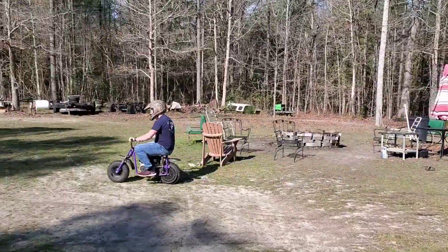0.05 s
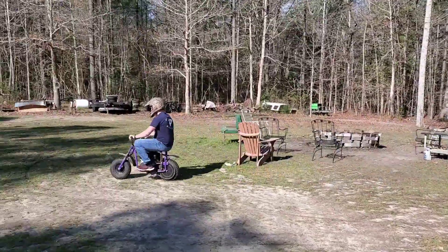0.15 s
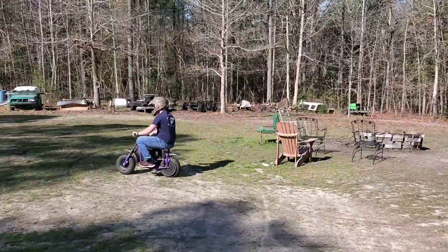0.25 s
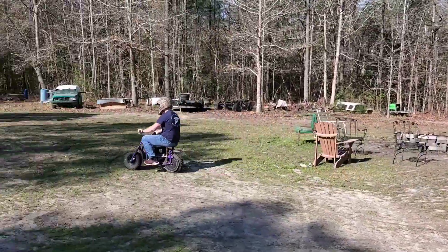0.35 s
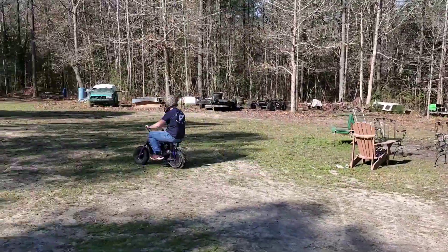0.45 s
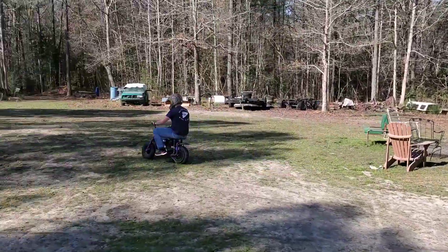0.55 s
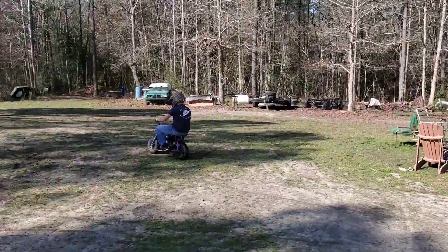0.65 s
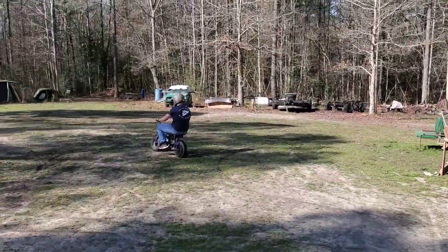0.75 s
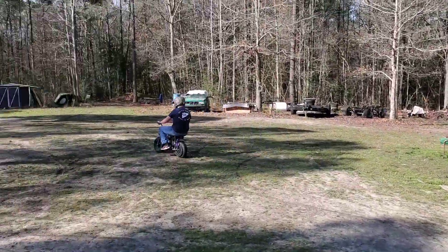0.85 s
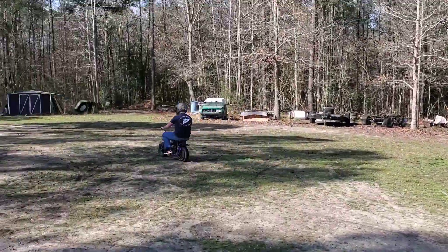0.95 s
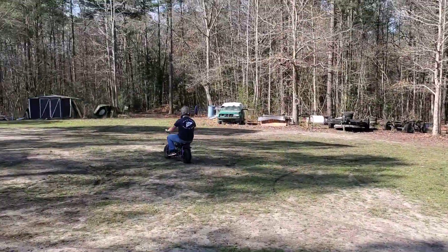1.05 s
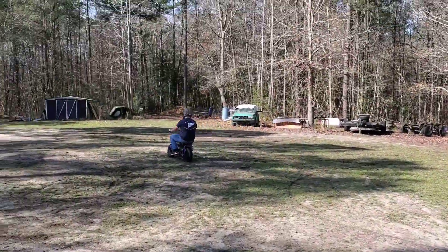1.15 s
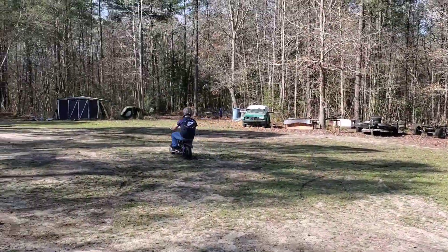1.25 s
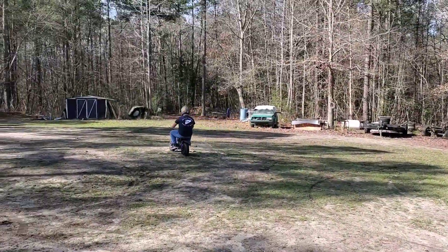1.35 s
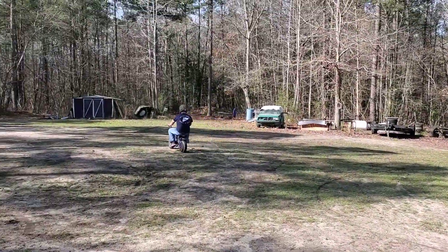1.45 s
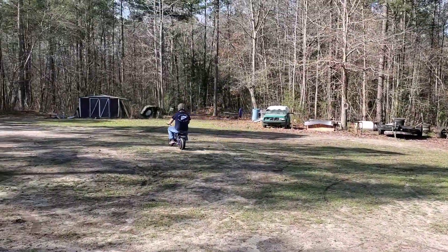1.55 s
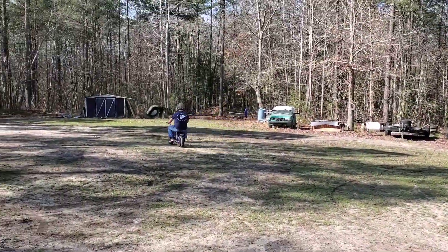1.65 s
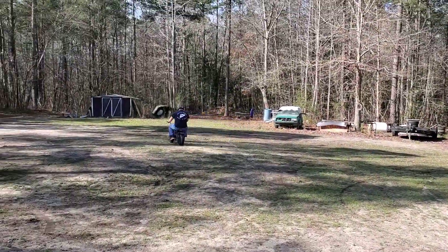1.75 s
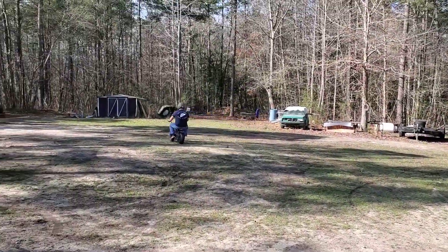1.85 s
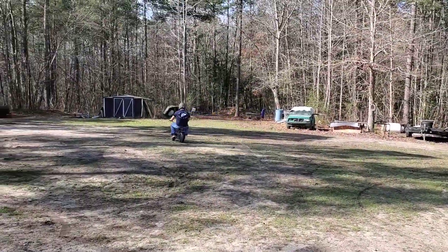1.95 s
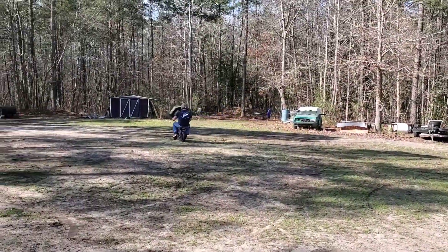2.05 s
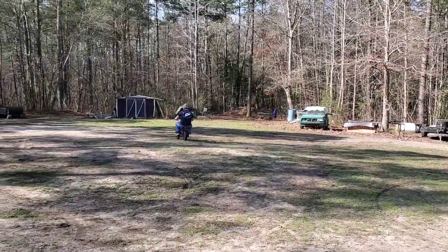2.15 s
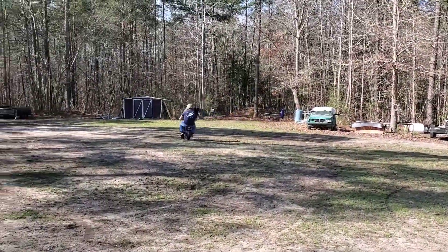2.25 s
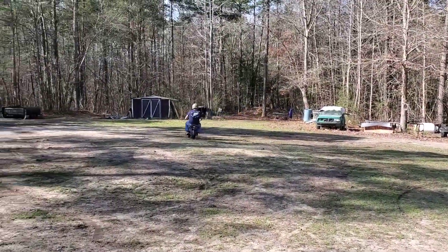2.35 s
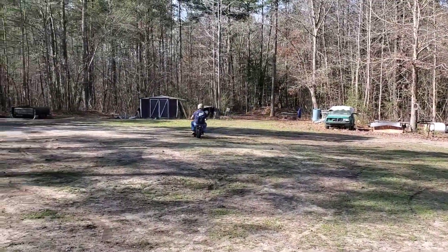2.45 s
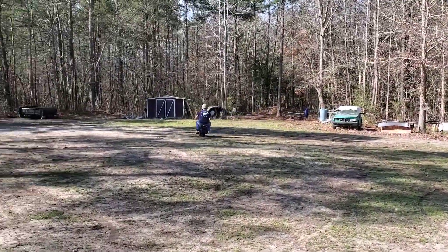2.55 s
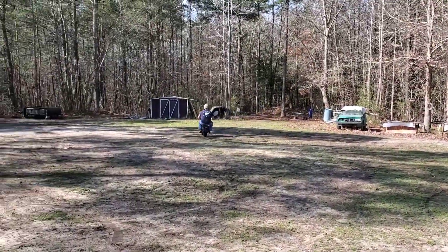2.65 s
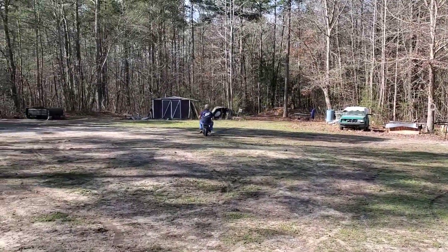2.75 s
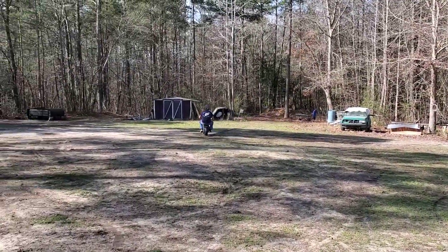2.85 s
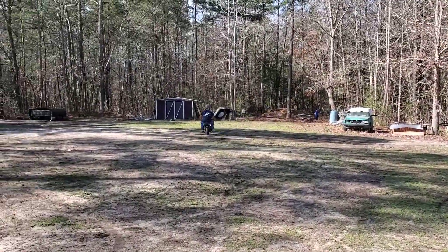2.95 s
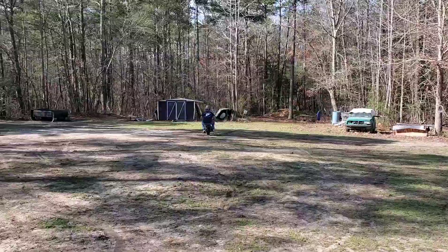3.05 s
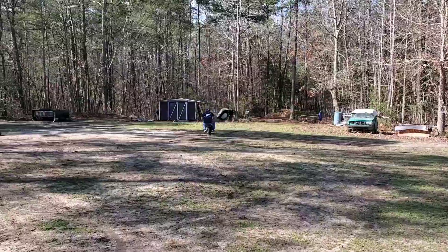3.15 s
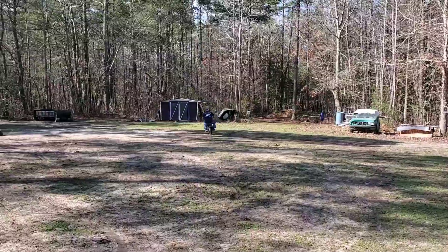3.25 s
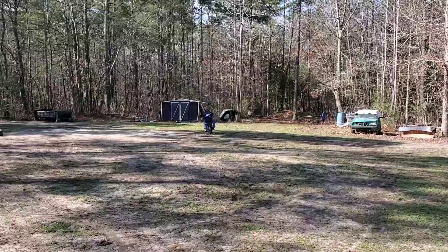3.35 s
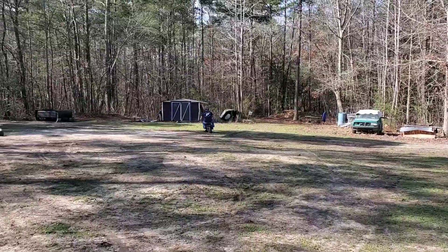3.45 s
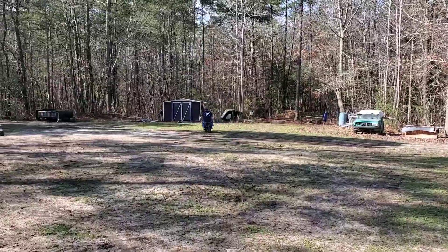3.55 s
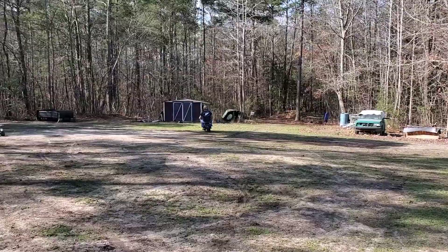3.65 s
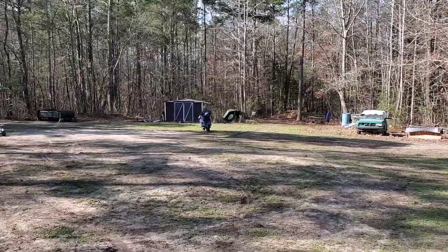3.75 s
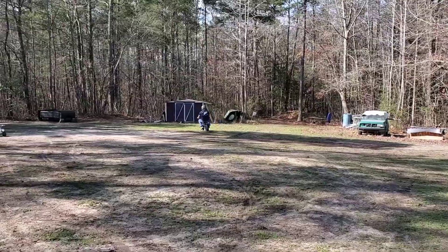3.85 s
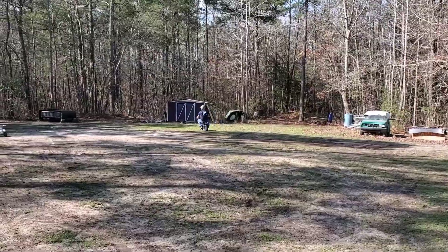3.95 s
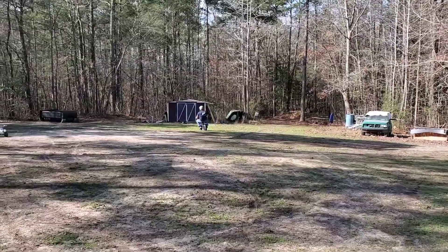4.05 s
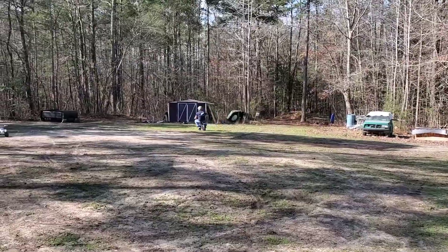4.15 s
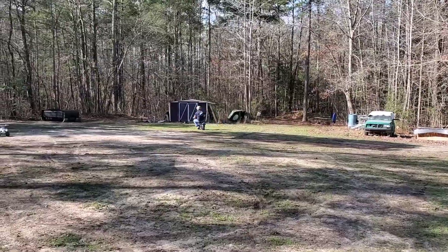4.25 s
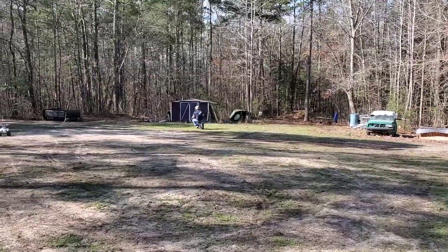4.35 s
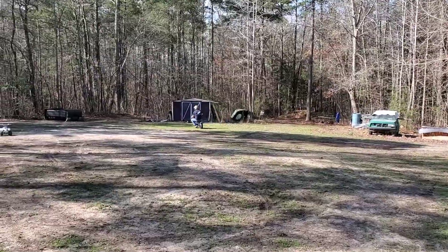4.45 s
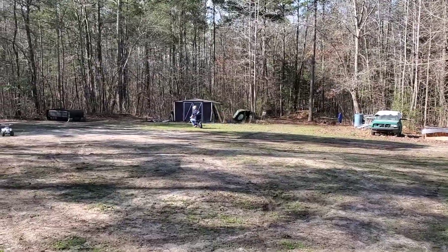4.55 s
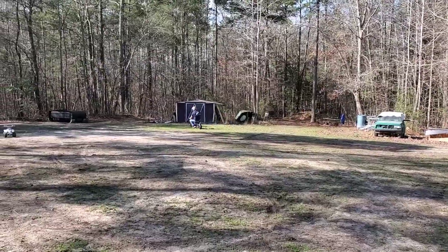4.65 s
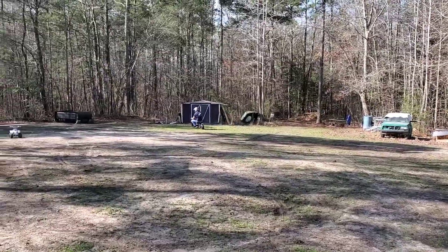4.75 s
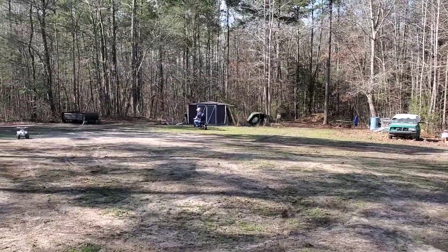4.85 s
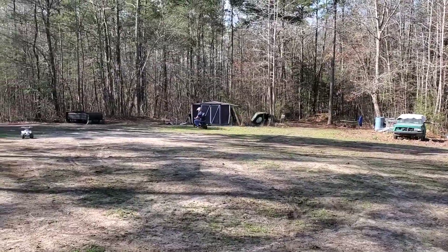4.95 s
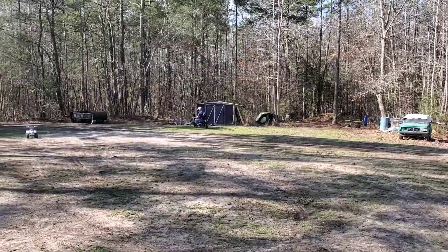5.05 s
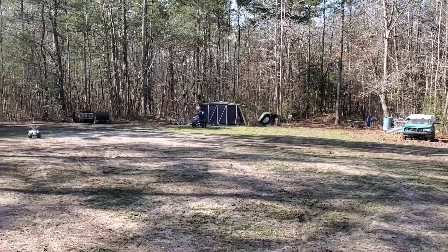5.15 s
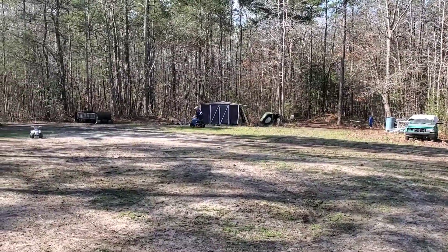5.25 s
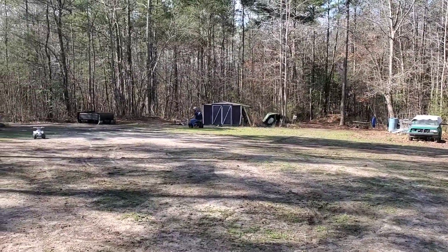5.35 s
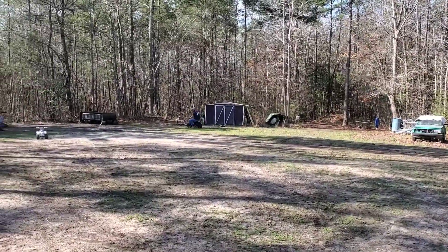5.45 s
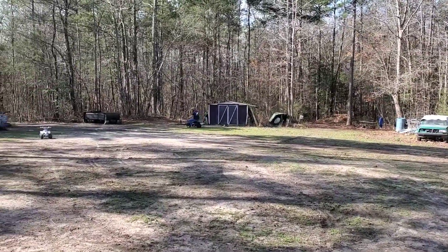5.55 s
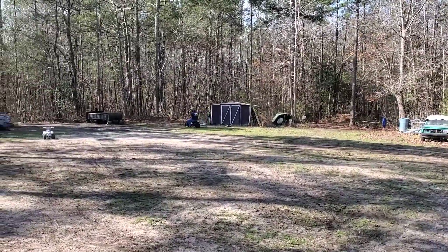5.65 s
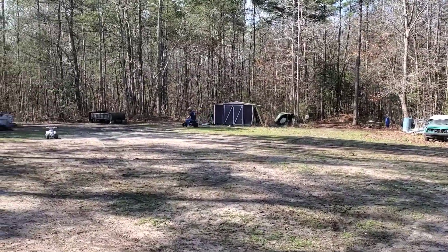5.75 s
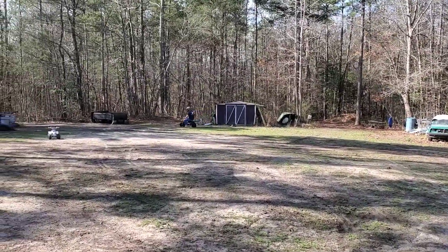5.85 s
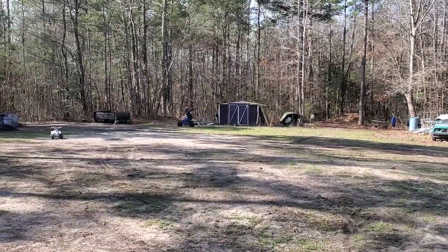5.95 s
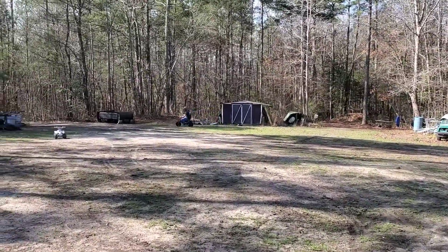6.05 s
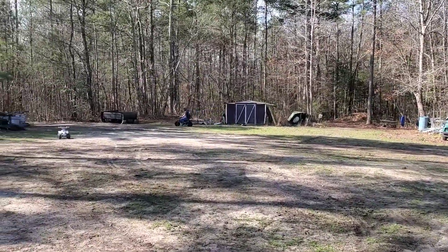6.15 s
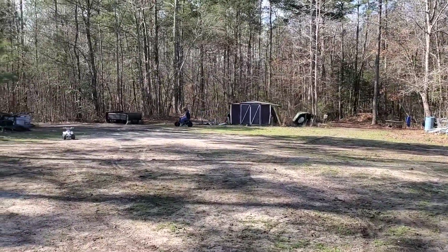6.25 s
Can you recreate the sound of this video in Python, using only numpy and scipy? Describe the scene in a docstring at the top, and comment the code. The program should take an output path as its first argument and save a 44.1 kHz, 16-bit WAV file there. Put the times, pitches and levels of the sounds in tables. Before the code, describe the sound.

At 0 s a small single-cylinder minibike is already running close to a stereo phone microphone in an open yard ringed by woods. Its putts come quickly, about 22 a second, with rushing gas, gritty metallic clatter and a bright, loose chain jingle leaning left. Low wind buffets bump the microphone around 0.2 and 0.3 s. Chain slaps splash through the first two seconds, densest from 1.2 to 2, then become sparse. The engine recedes, easing to about 17 putts a second by 2.5 s, with occasional uneven pops and a faint woodland echo. Around 3.8 s the exhaust briefly swells, with a short wind bump near 3.9. Afterward it is a distant, soft, deep putter at 15 to 17 a second over thin hiss. Dry scuffs appear near 3.6, 4.3, 4.7 and 6.1 s; faint falling bird whistles sound between 4.5 and 5.2 s.

```python
"""A four-stroke single minibike starts close by a phone in a yard ringed by woods and coasts away.
From the start wind, thin hiss, gas rush, engine clatter and jingling slack chain run as shaped noise.
Ringing gas pulses thump once a cycle, valves tick and the woods echo; chain slaps splash early on.
Farther off the engine slows to a putter; dry scuffs come, then a bird whistles in falling sine glides.
Two differently ringing microphone ports hear it all."""
import sys
import numpy as np
from scipy import signal
from scipy.fft import rfft, irfft, next_fast_len
from scipy.io import wavfile
from scipy.ndimage import uniform_filter1d

SR = 44100
rng = np.random.default_rng(int(sys.argv[2]) if len(sys.argv) > 2 else 0)


def waveform_to_disk(signal):
    """Save audio, clipped to [-1, 1], as 16-bit WAV at the path in sys.argv[1]."""
    frames = np.transpose(np.atleast_2d(signal))
    scaled = np.clip(frames, -1, 1) * 32767
    samples = np.round(scaled).astype(np.int16)
    wavfile.write(sys.argv[1], SR, samples)


N = 277461
TIME = np.arange(N) / SR

# Engine speed. Each row: time in seconds, firings per second.
ENGINE_SPEED = [(0.0, 22.5), (0.2, 21.0), (0.4, 20.7), (0.8, 20.78), (1.0, 19.5), (1.15, 19.2),
                (1.35, 19.11), (1.6, 18.22), (2.0, 17.65), (2.4, 17.22), (2.8, 17.0), (3.15, 15.85),
                (3.5, 16.51), (3.9, 15.86), (4.3, 16.44), (4.7, 16.67), (5.0, 15.69), (5.25, 15.38),
                (5.55, 15.34), (5.85, 16.7), (6.29, 17.03)]
# Which side of the bike faces the phone. Each row: time in seconds,
# view (0 near and side-on, 1 from behind, 2 far and turning).
BIKE_VIEW = [(0, 0.15), (.8, 0.2), (1.6, 1), (3.7, 1), (4.4, 1.59), (6.29, 1.9)]

# Colour of the wind rumble. Each row: frequency in Hz, gain in dB.
WIND_COLOUR = [(15, -19), (30, -5), (50, -0.5), (80, 17), (140, -3), (300, -6), (800, -53)]
# Gusts on the ports. Each row: centre in seconds, bell spread in seconds, level in dB.
WIND_GUSTS = [(0.186, 0.028, -26), (.331, 0.052, -24.5), (.925, 0.12, -34), (2.21, 0.5, -43.5),
              (3.907, 0.021, -22.5), (4.346, 0.052, -35)]
# Course of the thin hiss, which the valve ticks share. Each row: time in seconds, relative level in dB.
HISS_COURSE = [(0, -40.5), (.35, -43.5), (1.1, -36), (1.45, -41.5), (2.35, -44.5), (3.2, -37), (4.0, -41.5),
               (4.55, -47.5), (5.6, -41.5), (6.29, -43)]
# Colour of the still outdoor air. Each row: frequency in Hz, gain in dB.
AIR_COLOUR = [(60, -6), (250, -2), (500, 11), (1000, 35), (2000, 26), (5000, 27), (9000, 8), (14500, -38)]

# Colour of the gas rush, one list per view. Each row: frequency in Hz, gain in dB.
RUSH_COLOURS = [
    [(40, -3), (80, 20), (280, 8.5), (380, -7), (470, 13.5), (660, -19), (880, 12), (1100, -14),
     (1300, 0.5), (2200, -5.5)],
    [(40, -3), (80, 5.5), (260, 6), (360, -0.5), (570, -0.5), (780, -2), (980, -18), (1230, -2.5),
     (1500, -24), (2200, -27.5)],
    [(40, 9), (80, 21), (130, 13), (270, 12), (330, -1), (520, 17), (780, -9.5), (1030, 11.5), (1350, -18),
     (2200, -23)],
]
# Body of the engine clatter. Each row: frequency in Hz, gain in dB.
CLATTER_COLOUR = [(700, -1), (1000, 1), (1270, -2.5), (1550, -1.5), (2000, -4), (3000, -3.5), (4100, 1.5),
                  (4600, -7), (5200, -5), (6000, -21), (7500, -5), (9500, -10)]
# Level of the engine clatter. Each row: time in seconds, level in dB.
CLATTER_COURSE = [(0, -30.5), (.7, -32.5), (1.17, -33.5), (1.55, -36.5), (1.9, -36), (2.55, -40.5),
                  (3.17, -34), (3.35, -37), (3.65, -33), (4.1, -40.5), (6.29, -42.5)]
# Rings of the engine casing. Each row: frequency in Hz when loudest, drift in Hz per second,
# resonance width in Hz, gain in dB, loudest moment in seconds, bell spread in seconds.
CASING_RINGS = [(474, -0.5, 90, -7, 0.11, 0.36), (865, -93.5, 200, -3.5, .72, 0.26),
                (1390, -58.5, 800, -7.5, 0.095, 0.4), (1880, -150, 180, -16.5, 2.4, 1),
                (2270, -38.5, 600, -9, .3, 1), (2540, -22.5, 150, -16, 2.9, 0.7),
                (3310, 173.5, 210, -10.5, 2.3, 0.51), (3470, -31, 180, -9.5, 3.9, 0.45),
                (3550, -1, 320, -9, 1.15, 0.61), (4040, -61.5, 380, -5.5, 1.4, 0.83),
                (4060, 48, 340, -6.5, 3.8, 0.71)]

# Ring of the chain, one list per view. Each row: frequency in Hz, gain in dB.
CHAIN_COLOURS = [
    [(2500, -44), (5000, -10), (7000, 3.5), (10200, -0.5), (11500, -2), (14500, 14.5)],
    [(2500, -53), (5000, 3), (7000, -3), (10200, 0.5), (11500, 7), (14500, 3)],
    [(2500, -12), (5000, -53), (7000, 10), (10200, -3.5), (11500, 2), (14500, 6)],
]
# Level of the chain's jingle. Each row: time in seconds, level in dB.
JINGLE_COURSE = [(0, -23.5), (.5, -24.5), (.95, -28.5), (1.25, -33.5), (1.9, -28.5), (2.15, -32.5),
                 (2.5, -36), (2.75, -36.5), (2.95, -33), (3.65, -36.5), (4.15, -44.5), (5.1, -47.5),
                 (6.29, -42.5)]
# Chain slaps. Each row: start in seconds, relative strength in dB, left minus right in dB.
CHAIN_SLAPS = [(0.133, 4, 12), (.152, 6.5, 5), (0.2, 5, 2), (0.294, 8, 4), (0.68, -5, -9), (0.834, 2, -5),
               (0.844, 4, 0), (1.166, 3.5, 4), (1.218, 6.5, 2), (1.271, 3, 4), (1.315, 4.5, 3),
               (1.418, 3.5, -4), (1.459, 0, 3), (1.486, 4, -1), (1.526, 0, -4), (1.577, 1, -5),
               (1.693, 2, -6), (1.75, 0, -8), (1.774, 2, 0), (1.812, 0.5, -7), (1.879, 0, 3), (1.902, 3, 3),
               (1.932, -1, 2), (1.988, 1, 6), (2.174, -4.5, -5), (2.299, -2, 0), (2.407, -1, 5),
               (2.54, -5, 3), (2.586, -3, 2), (2.947, -3.5, -5), (3.151, -6, 5), (3.188, -8, 4),
               (3.365, -6, 2), (3.671, -2, -11), (3.809, -10, -9)]

# Rings of the muffler. Each row: frequency in Hz, width in Hz, gain in dB.
MUFFLER_RINGS = [(262, 16, -2), (268, 80, 1.5), (475, 70, -1.5)]
# Gas pulse of the exhaust: share of the cycle, ring in Hz at the start and end of the ride,
# resonance width in Hz at the start and end, edge of the rounded front in Hz.
EXHAUST_PULSE = (0.006, (205, 106), (185, 140), 560)
# Gas pulse of the intake, in the same columns.
INTAKE_PULSE = (.312, (106, 78), (190, 62), 560)
# Misfires and hard pops of the exhaust. Each row: time in seconds, dB against a usual firing.
ODD_FIRINGS = [(.02, -9), (.16, -12), (.208, 6), (.303, 5), (.592, -12), (.785, -12), (.834, 3), (.885, 4),
               (.98, -9), (1.137, -9), (1.243, -7), (1.616, 4), (1.78, 4), (1.892, 5), (2.003, 3),
               (2.235, 4), (2.35, 4), (3.862, 4), (3.922, 4), (5.03, 3), (5.61, 4)]
# The exhaust points at the phone for a while: centre in seconds, bell spread in seconds,
# gain of the thumps in dB, gain of the rush in dB.
EXHAUST_FACING = (3.82, 0.57, 1.3, 3.6)
# Rings of the valve cover. Each row: frequency in Hz, width in Hz, gain in dB.
VALVE_COVER_RINGS = [(3840, 72, 1), (5650, 34, 17), (5790, 73, 12)]

# Short dry scuffs. Each row: centre in seconds, level in dB, bell spread in seconds, centre in Hz.
SCUFFS = [(3.585, -37.5, .013, 1900), (4.285, -40, .013, 2100), (4.355, -41.5, .006, 4100),
          (4.656, -31, .0025, 5500), (4.657, -37.5, .003, 2000), (4.685, -41, .022, 1850),
          (4.685, -44, .02, 3600), (6.123, -38.5, .004, 800), (6.14, -47.5, .022, 600),
          (6.218, -41.5, .005, 2300)]
# Bird whistles. Each row: start in seconds, length in seconds, start in Hz, end in Hz, level in dB.
BIRD_WHISTLES = [(4.46, .1, 3000, 2550, -47.5), (4.71, .09, 2880, 2450, -47.5),
                 (4.95, .085, 3000, 2550, -46.5), (5.07, .11, 2930, 2600, -49)]

# Colour of the left microphone port. Each row: frequency in Hz, gain in dB.
LEFT_PORT = [(1200, -3), (2500, 1.6), (4000, 1.4), (5850, 5), (6450, -1), (7100, -5), (7600, -29),
             (8200, -3.5), (8800, -0.5), (10200, 13), (11200, 6), (12400, -12), (14600, -7.5)]
# Colour of the right microphone port. Each row: frequency in Hz, gain in dB.
RIGHT_PORT = [(1200, -3.5), (2500, 4.5), (4200, 0.04), (5200, -0.7), (6800, -2), (8200, -58), (9500, -1),
              (11200, 9), (12600, 1), (14600, -4)]


def undb(db):
    """Decibels to gain."""
    return 10 ** (np.asarray(db) / 20)


def unit(x):
    """Scale to rms 1."""
    return x / np.sqrt(np.mean(x ** 2))


def curves(table):
    """Each column of a time table at every sample."""
    s, *columns = np.transpose(table)
    return [np.interp(TIME, s, c) for c in columns]


def shape(x, response):
    """Filter by a response given as a function of frequency."""
    size = next_fast_len(N + SR)
    f = np.arange(size // 2 + 1) * SR / size
    return irfft(rfft(x, size) * response(f), size)[..., :N]


def colour(x, points):
    """Filter by (Hz, dB) points, joined along log frequency."""
    hz, db = np.transpose(points)
    return shape(x, lambda f: undb(np.interp(np.log(f + 1), np.log(hz), db)))


def resonance(f, hz, width_hz):
    """Response of one resonance, gain 1 at its centre."""
    return 1j * f * width_hz / (hz ** 2 - f ** 2 + 1j * f * width_hz)


def ring(x, hz, width_hz):
    """Pass a sound through one resonance."""
    return shape(x, lambda f: resonance(f, hz, width_hz))


def ring_twice(x, hz, width_hz):
    """Pass a sound through the same resonance twice, for steeper skirts; rms 1."""
    return unit(ring(ring(x, hz, width_hz), hz, width_hz))


def walk(rate):
    """Random levels held 1 / rate s and slewed; spread near 1."""
    k = int(SR / rate)
    held = np.repeat(rng.standard_normal(N // k + 1), k)
    return unit(uniform_filter1d(held, k)[:N])


def pan(db):
    """Left and right gains for a level difference, left minus right."""
    return undb(np.array([[1], [-1]]) * db / 2)


def noise(width):
    """Stereo noise: a shared middle plus width times an opposed side; width 1 is unrelated."""
    mid, side = rng.standard_normal((2, N))
    return unit(mid + width * side * np.array([[1], [-1]]))


def strikes(at, sizes):
    """Single clicks at the given samples."""
    return np.bincount(np.clip(at, 0, N - 1).astype(int), sizes, N)


def fade(x, seconds):
    """Give every click an exponential tail."""
    return signal.lfilter([1], [1, -np.exp(-1 / (seconds * SR))], x)


def swell(s, spread_s):
    """A bell-shaped rise and fall around a moment."""
    return np.exp(-((TIME - s) / spread_s) ** 2 / 2)


def drifting(x, hz_per_s, s):
    """Slide a sound steadily in frequency; at time s it is unchanged."""
    analytic = signal.hilbert(x, next_fast_len(N))[..., :N]
    return np.real(analytic * np.exp(1j * np.pi * hz_per_s * (TIME - s) ** 2))


def views():
    """Share of each of the three views at every moment."""
    view = curves(BIKE_VIEW)[0]
    return [np.clip(1 - abs(view - k), 0, 1) for k in range(len(RUSH_COLOURS))]


def turning(x, spectra):
    """The colour of a sound changes as the bike turns."""
    return sum(np.sqrt(seen) * unit(colour(x, points)) for seen, points in zip(views(), spectra))


def receding(near_db, loss_db, near_m=2.7, away_m_per_s=4.8, closest_s=.08):
    """Level in dB on a straight pass, falling by loss_db with every doubling of the distance."""
    distance_m = np.hypot(near_m, away_m_per_s * (TIME - closest_s))
    return near_db - loss_db * np.log2(distance_m / near_m)


def each_cycle(cycle, share):
    """The samples at which the crank passes a given share of its cycle."""
    return np.searchsorted(cycle, np.arange(1, int(cycle[-1])) + share)


def wind(breeze_db=-31.5, fall_db_per_s=1.43, pan_db=3):
    """Wind rumbles on the ports: a breeze that dies away with a few gusts on top."""
    strength = undb(breeze_db - fall_db_per_s * TIME)
    strength = strength + sum(undb(db) * swell(s, spread_s) for s, spread_s, db in WIND_GUSTS)
    return unit(colour(noise(width=0.57), WIND_COLOUR)) * strength * pan(pan_db)


def hiss(offset_db=-8, flutter_db=2.4, hz=5770, width_hz=380, pan_db=15):
    """A narrow resonant band of noise wavers in level, mostly at the left."""
    level_db = curves(HISS_COURSE)[0] + offset_db + flutter_db * walk(45)
    return ring_twice(noise(width=0.11), hz, width_hz) * undb(level_db) * pan(pan_db)


def still_air(level_db=-50.0):
    """Steady, faint noise of the open air."""
    return unit(colour(noise(width=0.49), AIR_COLOUR)) * undb(level_db)


def rush(cycle, burst=1.0, burst_cycles=.09, intake_burst=.6):
    """Turbulent gas surges as the exhaust valve opens and swells again on the intake stroke."""
    turn = cycle % 1
    exhaust = np.exp(-turn / burst_cycles)
    intake = np.exp(-((turn - .46) / .09) ** 2)
    gas = noise(width=0.28) * (1 + burst * exhaust + intake_burst * intake)
    return turning(gas, RUSH_COLOURS)


def clatter(cycle, throb=0.017, grit_db=2.0, flutter_db=2.45):
    """Gritty valve-gear and clutch noise swells once a cycle; casing rings drift as the bike swings round."""
    gate = (1 + throb * np.cos(2 * np.pi * (cycle - .15))) * undb(grit_db * walk(330))
    out = unit(colour(noise(width=0.53) * gate, CLATTER_COLOUR))
    for hz, drift_hz_per_s, width_hz, db, s, spread_s in CASING_RINGS:
        tone = ring_twice(noise(width=0.1) * gate, hz, width_hz)
        level = swell(s, spread_s) * undb(db + flutter_db * walk(60))
        out = out + drifting(tone, drift_hz_per_s, s) * level
    return unit(out)


def link_pings(count=5000, size=700, low_hz=8500, high_hz=14500, decay_s=.004, range_db=14, pan_db=9):
    """Single links clink as decaying sines, each with its own pitch, strength and side."""
    out, t = np.zeros((2, N + size)), TIME[:size]
    for when, pitch, strength, side in rng.random((count, 4)):
        hz = low_hz + (high_hz - low_hz) * pitch
        ping = np.sin(2 * np.pi * hz * t) * np.exp(-t / decay_s) * undb(-range_db * strength)
        at = int(when * N)
        out[:, at:at + size] += ping * pan(pan_db * (2 * side - 1))
    return unit(out[:, :N])


def chain(shakes_per_s=150, shake_s=.007, scatter_db=2.0, link_db=1.7, roll=1.6, clink=.5):
    """Links roll steadily over the sprockets, clink, and jingle in bursts as the slack shakes."""
    chance, size = rng.random(N), rng.standard_normal(N)
    shakes = (chance < shakes_per_s / SR) * undb(scatter_db * np.clip(size, -2, 1))
    jingle = (roll + fade(shakes, shake_s)) * undb(link_db * walk(620))
    # even out the slow level, keep the bursts
    jingle /= np.sqrt(uniform_filter1d(jingle ** 2, SR // 5))
    return turning((noise(width=0.55) + clink * link_pings()) * jingle, CHAIN_COLOURS)


def jingle_level(cycle, bump_db=.8, bumps_per_s=14, snatch_db=.9, snatch_share=.08):
    """Chain gain: the ground shakes it unevenly and it snatches once an engine cycle."""
    bumps = bump_db * walk(bumps_per_s)
    snatch = snatch_db * np.cos(2 * np.pi * (cycle - snatch_share))
    return undb(curves(JINGLE_COURSE)[0] + bumps + snatch)


def knocks(cycle, share, modes, scatter_db):
    """One blow a cycle rings a set of modes."""
    at = each_cycle(cycle, share)
    blows = strikes(at, undb(scatter_db * np.clip(rng.standard_normal(len(at)), -2, 1.5)))
    return unit(sum(undb(db) * unit(ring(blows, hz, width_hz)) for hz, width_hz, db in modes))


def stroke(cycle, kind, odd=(), size=4096, scatter_db=.8, pitch_scatter=.04, jitter_s=.0002):
    """One gas pulse a cycle rings its pipe; no two are alike in strength, pitch or timing."""
    share, ring_hz, width_hz, edge_hz = kind
    f = np.arange(size // 2 + 1) * SR / size
    out = np.zeros(N + size)
    for at in each_cycle(cycle, share):
        strength, pitch, late = np.clip(rng.standard_normal(3), -1.6, 1.6)
        odd_db = sum(db for s, db in odd if abs(s - at / SR) < .02)
        # the putt deepens and rings longer as the bike slows and recedes
        hz = np.interp(at, [0, N], ring_hz) * np.exp(pitch_scatter * pitch)
        pipe = resonance(f, hz, np.interp(at, [0, N], width_hz))
        # a valve opens gradually, which rounds the front of the pulse
        puff = irfft((pipe / (1 + 1j * f / edge_hz)) ** 2)
        at += int(late * jitter_s * SR)
        out[at:at + size] += unit(puff) * undb(scatter_db * strength + odd_db)
    return unit(out[:N])


def muffler_bark(cycle, soft_hz=750):
    """Each firing knocks the muffler into ringing, with the treble softened."""
    blows = knocks(cycle, 0, MUFFLER_RINGS, scatter_db=3)
    return unit(shape(blows, lambda f: 1 / (1 + 1j * f / soft_hz) ** 2))


def thumps(cycle):
    """Exhaust pulses, now and then weak or popping, with muffler bark; the intake follows .306 cycle later."""
    bark = muffler_bark(cycle) * undb(receding(-37, 3.3))
    exhaust = stroke(cycle, EXHAUST_PULSE, ODD_FIRINGS) * undb(receding(-30, 1.7))
    intake = stroke(cycle, INTAKE_PULSE) * undb(receding(-28.3, 3.8))
    return bark + exhaust + intake


def valves(cycle, share=.6, offset_db=-13, pan_db=14):
    """The valve gear ticks once a cycle and pings its cover, mostly at the left."""
    ticks = knocks(cycle, share, VALVE_COVER_RINGS, scatter_db=4)
    return ticks * undb(curves(HISS_COURSE)[0] + offset_db) * pan(pan_db)


def woods(x, t60_s=0.8, gap_s=0.029):
    """Trunks scatter a diffuse tail after a short gap, partly different at each port."""
    tail = noise(width=0.25) * undb(-60 * TIME / t60_s) * np.clip(TIME / gap_s - 1, 0, 1)
    return unit(signal.fftconvolve(x[None], tail[:, :SR], axes=1)[:, :N])


def slaps(gain_db=-13.7, low_cut_hz=6500, decay_s=.007, rise_s=.003):
    """The chain whips against its guard: a bright splash of links."""
    s, db, pan_db = np.transpose(CHAIN_SLAPS)
    hits = np.array([strikes(s * SR, side) for side in undb(db + gain_db) * pan(pan_db)])
    envelope = fade(hits, decay_s) - fade(hits, rise_s)
    splash = turning(noise(width=0.96), CHAIN_COLOURS) * envelope
    return shape(splash, lambda f: f ** 3 / np.hypot(f ** 3, low_cut_hz ** 3))


def scuffs(width_hz=1500, wet=.45):
    """Brief gritty scrapes of resonant noise with a short tail from the trees."""
    grit = noise(width=0.17) * undb(2 * walk(500))
    scrapes = 0
    for s, db, spread_s, hz in SCUFFS:
        scrapes = scrapes + ring_twice(grit, hz, width_hz) * undb(db) * swell(s, spread_s)
    return scrapes + wet * np.std(scrapes) * woods(scrapes[0])


def bird(wet=.7, waver_hz=35, flutter_db=2.5):
    """Falling, wavering sine whistles from the woods, blurred by the trees."""
    song = 0
    for s, length_s, start_hz, end_hz, db in BIRD_WHISTLES:
        part = np.clip((TIME - s) / length_s, 0, 1)
        hz = start_hz + (end_hz - start_hz) * part + waver_hz * walk(120)
        level = undb(db + flutter_db * walk(70)) * np.sin(np.pi * part)
        song = song + level * np.sin(2 * np.pi * np.cumsum(hz) / SR)
    return song + wet * np.std(song) * woods(song)


def scene(start_cycles=.572, echo_db=-20):
    """The bike rides off across the yard; its putts echo faintly from the woods."""
    cycle = start_cycles + np.cumsum(curves(ENGINE_SPEED)[0]) / SR
    facing_s, facing_spread_s, thump_gain_db, rush_gain_db = EXHAUST_FACING
    facing = swell(facing_s, facing_spread_s)
    outdoors = wind() + hiss() + still_air()
    gas = rush(cycle) * undb(receding(-30, 3.05) + rush_gain_db * facing)
    rattle = clatter(cycle) * undb(curves(CLATTER_COURSE)[0])
    # the jingle leans left while the bike is near
    jingle = chain() * jingle_level(cycle) * pan(3 * views()[0] - 1.2)
    putter = thumps(cycle)
    echo = undb(echo_db) * np.std(putter) * woods(putter)
    putts = (putter + echo) * undb(thump_gain_db * facing)
    bike = gas + rattle + jingle + putts + valves(cycle) + slaps()
    return outdoors + bike + scuffs() + bird()


def record(dry, lead_rad=1.62, knee_hz=3300, low_cut_hz=27, top_hz=14560):
    """The left port leads in phase; each port has its own colour; the phone cuts deepest bass and top."""
    right = shape(dry[1], lambda f: np.exp(-1j * lead_rad * np.tanh(f / knee_hz)))
    heard = np.array([colour(dry[0], LEFT_PORT), colour(right, RIGHT_PORT)])
    heard = shape(heard, lambda f: f ** 4 / np.hypot(f ** 4, low_cut_hz ** 4))
    top_cut = signal.ellip(10, .2, 80, top_hz, fs=SR, output="sos")
    return signal.sosfilt(top_cut, heard)


dry = scene()
out = record(dry)
waveform_to_disk(out)
```